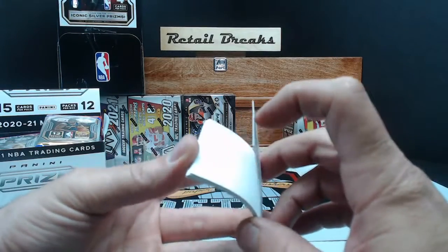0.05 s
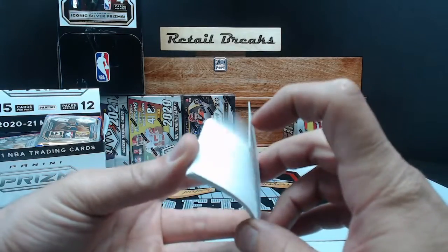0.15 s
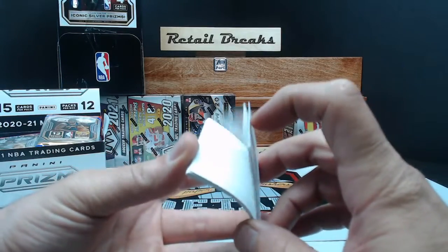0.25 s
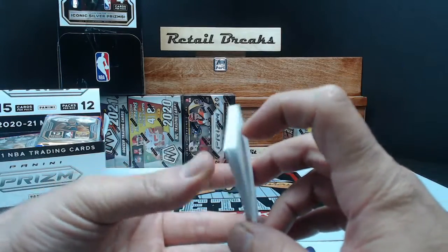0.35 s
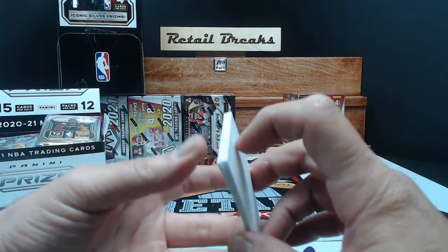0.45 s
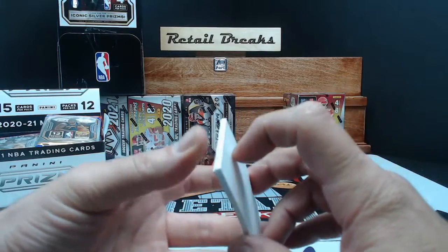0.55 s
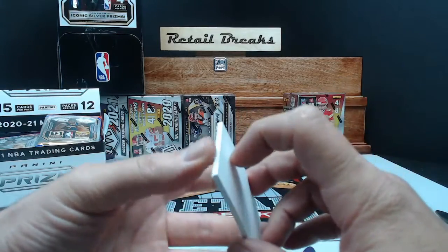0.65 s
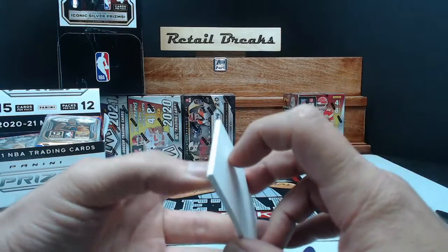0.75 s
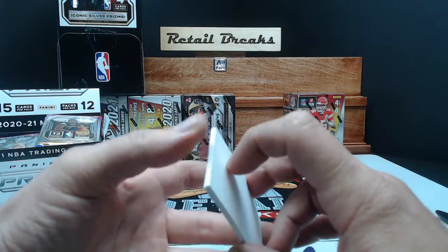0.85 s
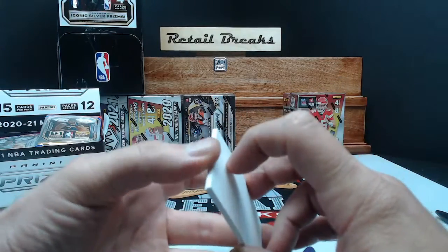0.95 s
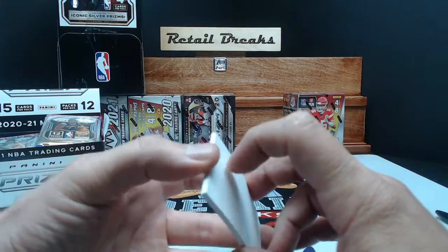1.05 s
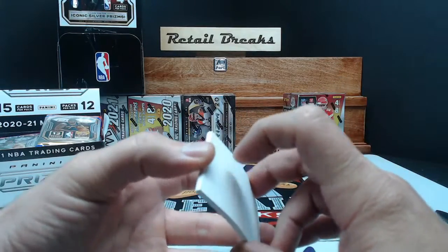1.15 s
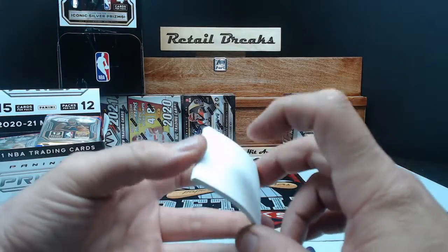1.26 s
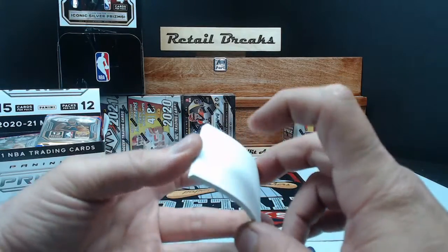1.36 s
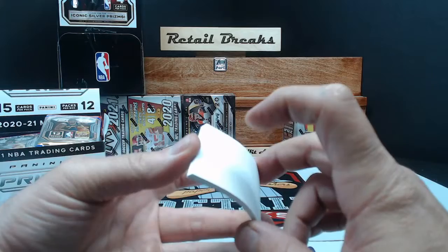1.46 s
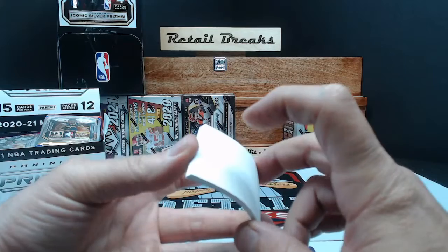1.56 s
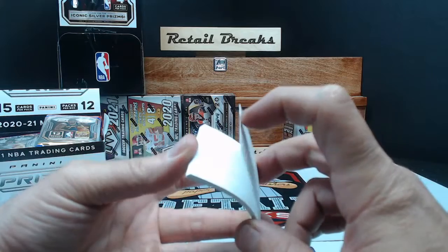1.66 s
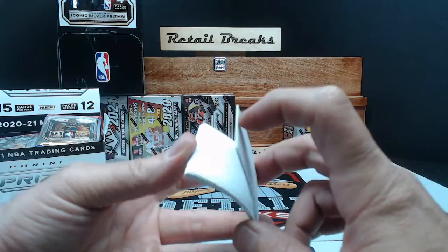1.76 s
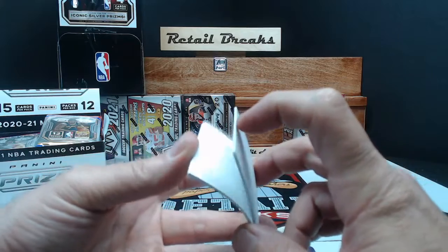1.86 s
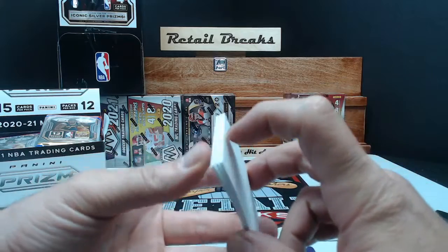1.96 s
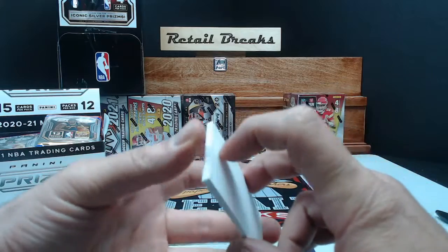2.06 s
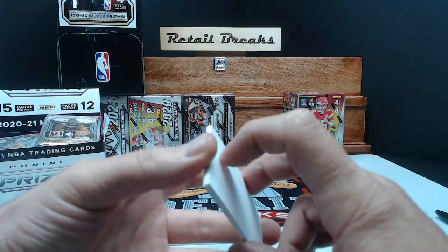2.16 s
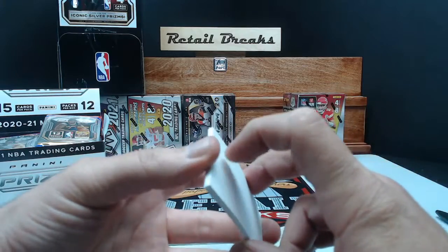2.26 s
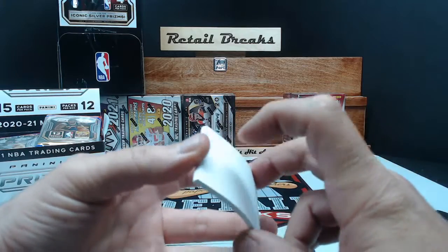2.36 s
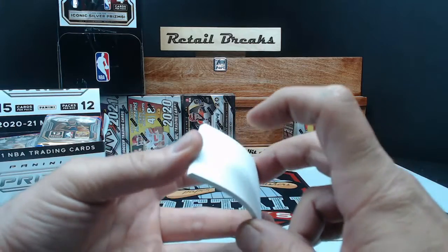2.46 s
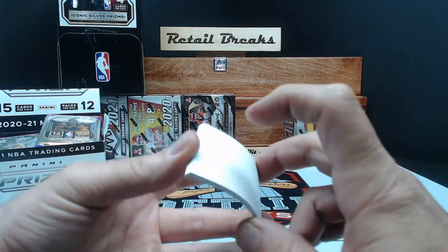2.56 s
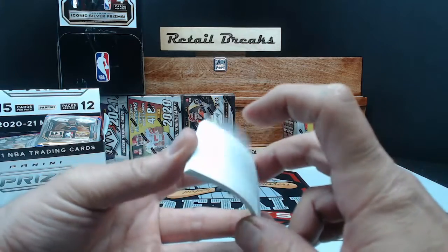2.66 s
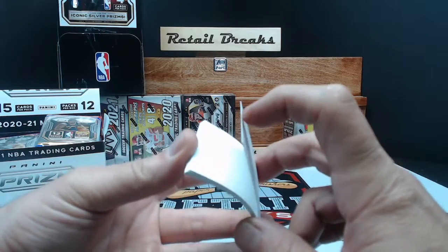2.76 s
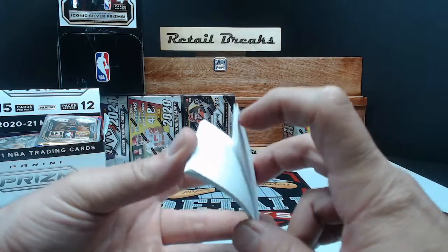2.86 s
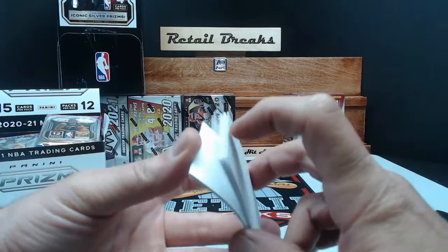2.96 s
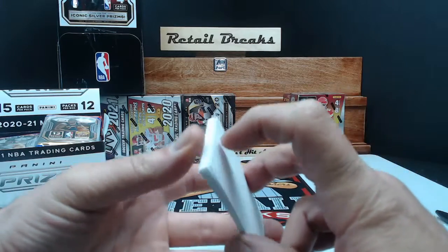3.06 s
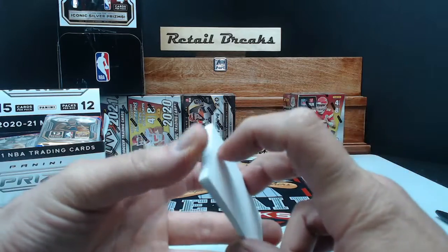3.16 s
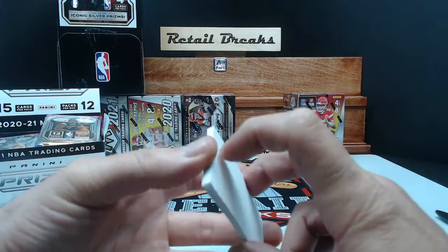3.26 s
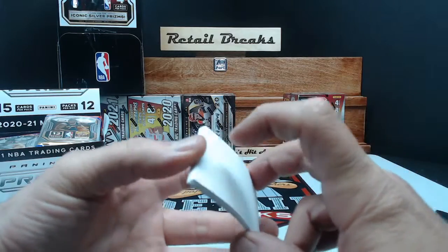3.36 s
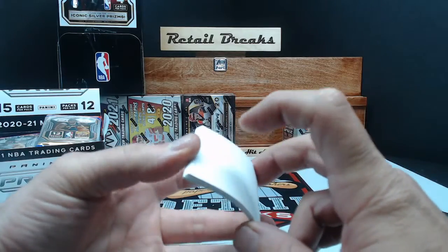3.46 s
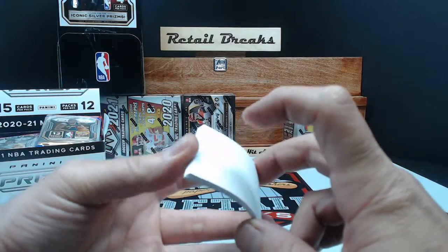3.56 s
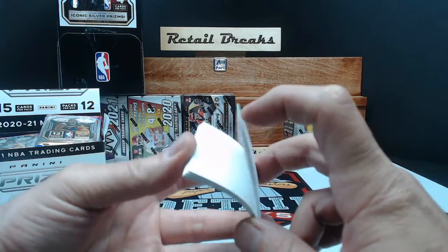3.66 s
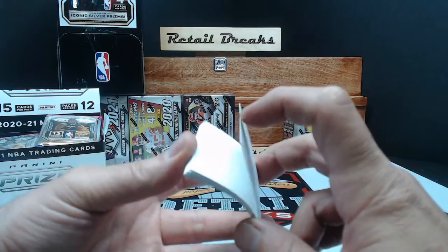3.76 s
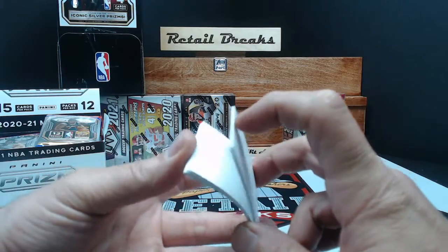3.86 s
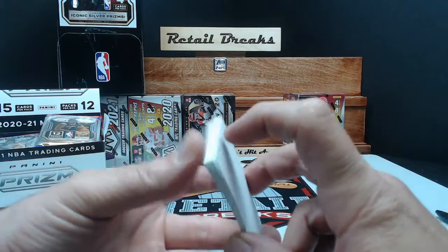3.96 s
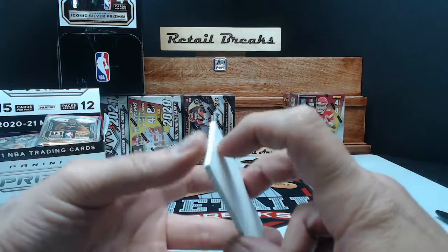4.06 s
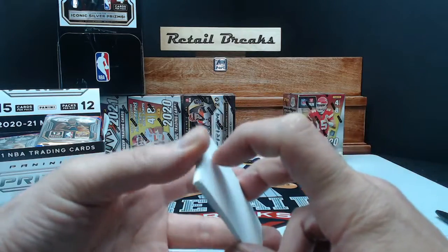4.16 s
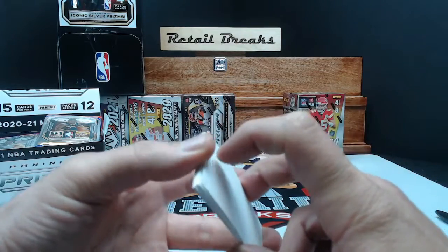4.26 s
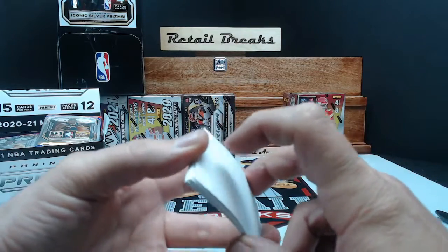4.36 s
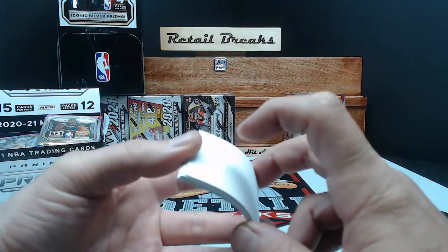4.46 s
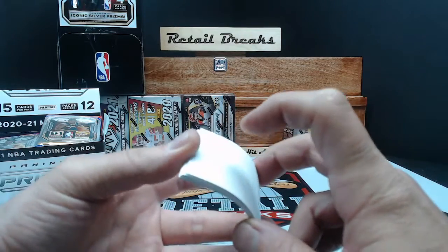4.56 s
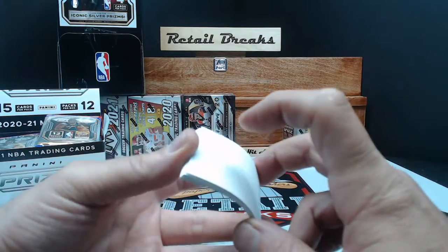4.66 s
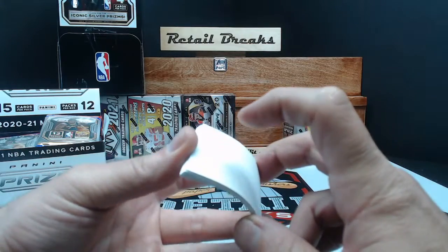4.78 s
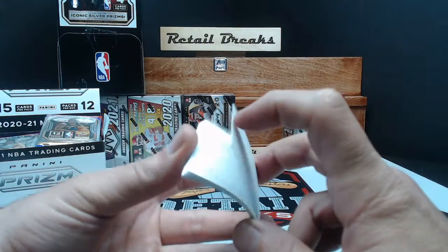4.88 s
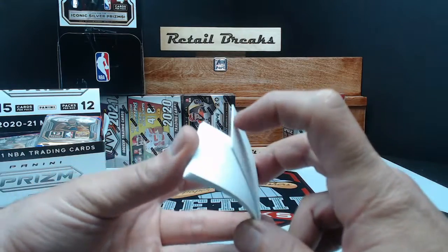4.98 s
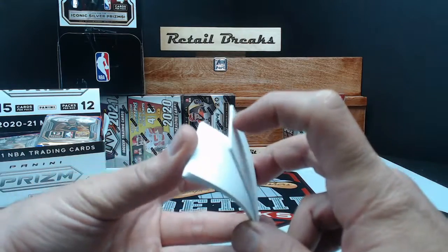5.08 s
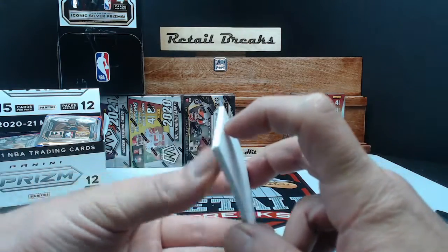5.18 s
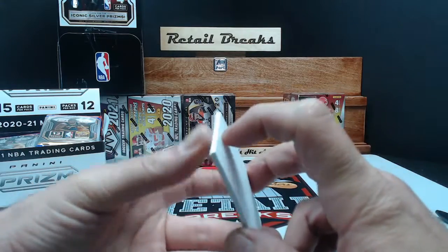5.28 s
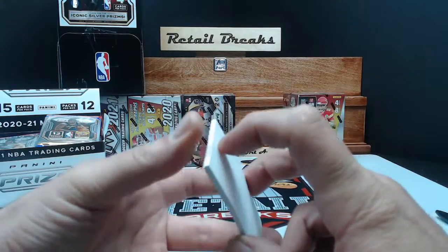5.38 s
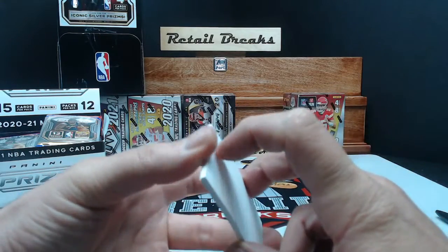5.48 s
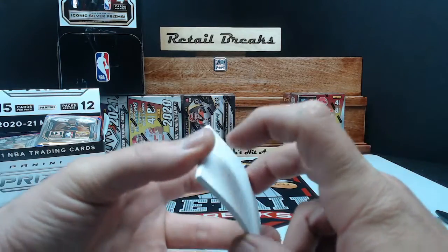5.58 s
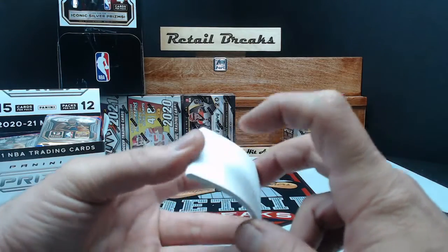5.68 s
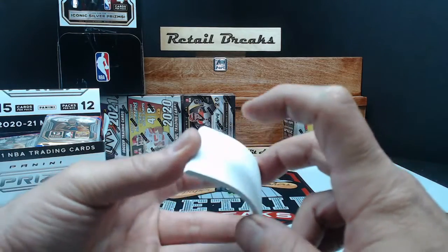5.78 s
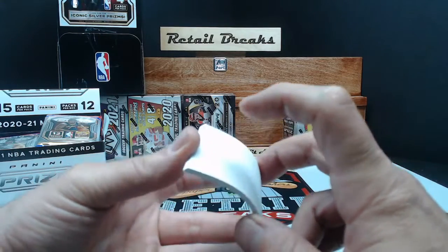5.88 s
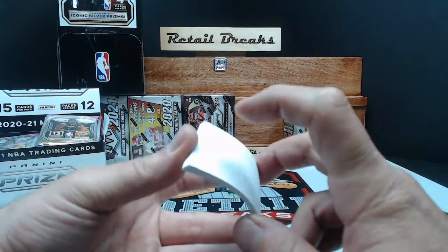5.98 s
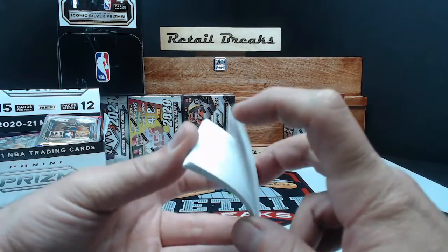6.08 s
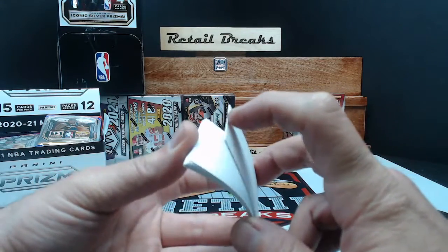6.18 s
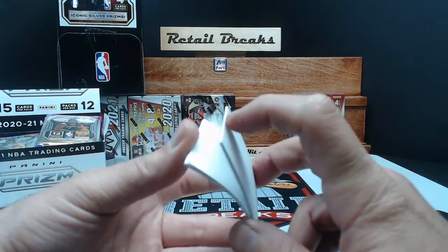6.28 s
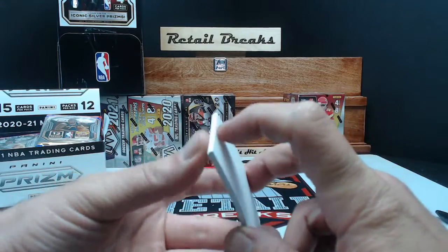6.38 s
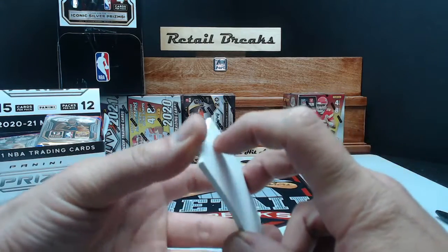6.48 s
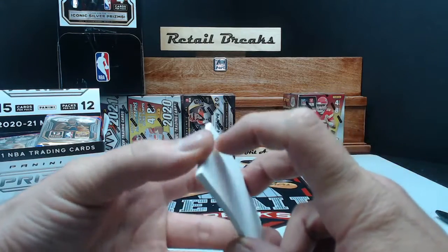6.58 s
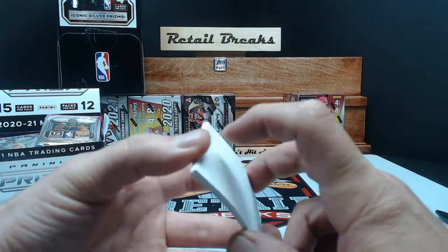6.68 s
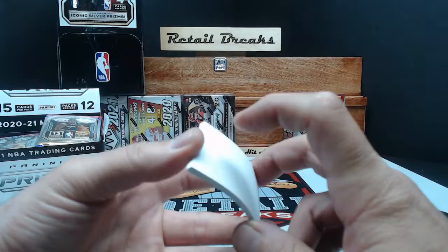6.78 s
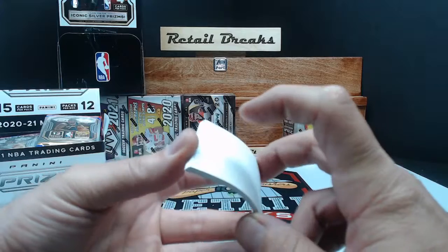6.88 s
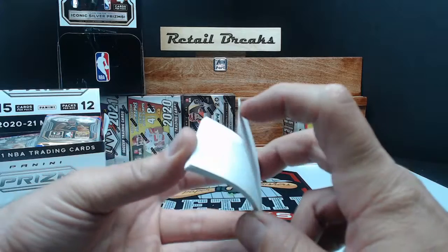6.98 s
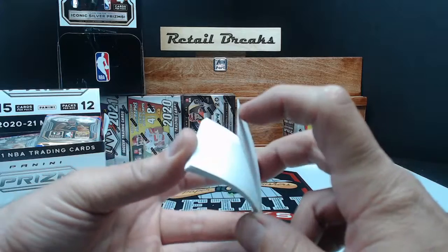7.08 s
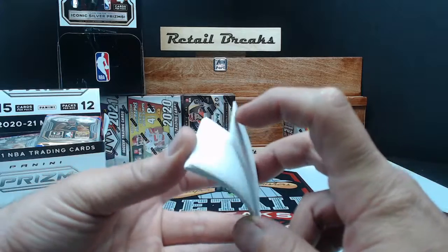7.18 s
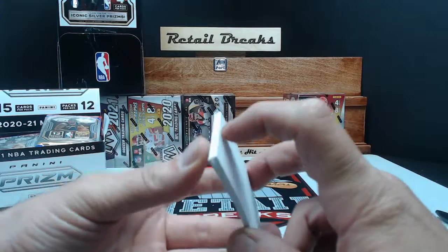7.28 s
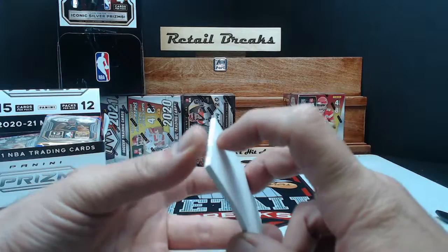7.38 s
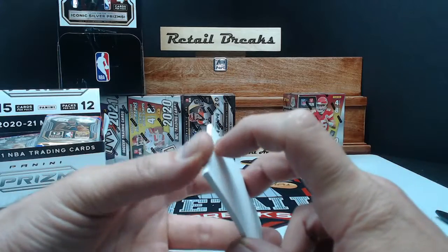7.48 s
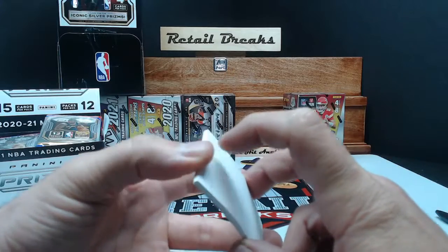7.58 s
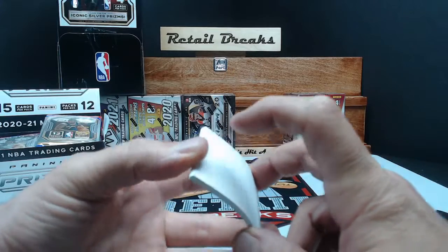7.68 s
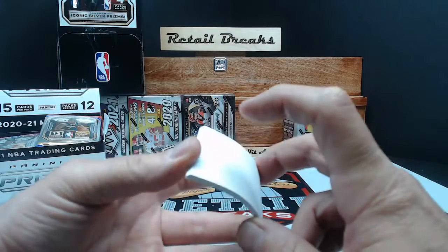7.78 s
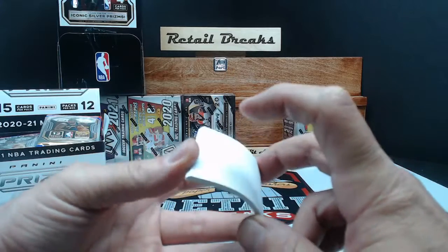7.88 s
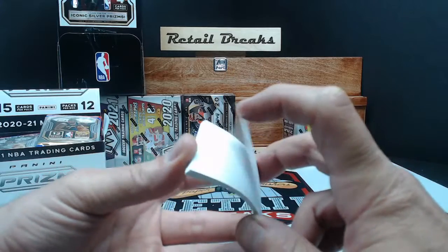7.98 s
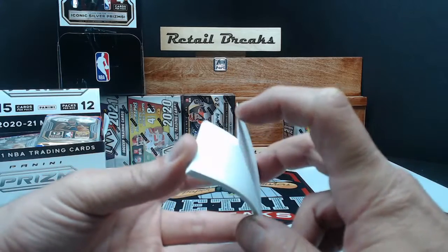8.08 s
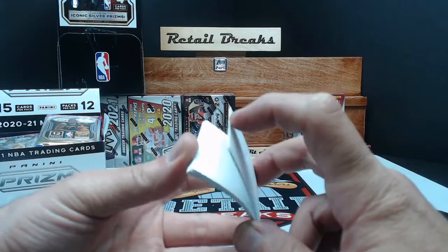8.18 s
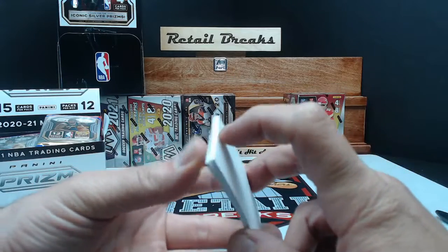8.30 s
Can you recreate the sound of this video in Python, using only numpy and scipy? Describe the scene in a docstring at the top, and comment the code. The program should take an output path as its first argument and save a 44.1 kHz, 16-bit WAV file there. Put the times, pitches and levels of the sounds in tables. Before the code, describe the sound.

A stack of cards is thumbed by hand, each bent card snapping free with a sharp crack, then ticking and scraping back into place over faint hum.

```python
"""Thumbing through trading cards

A stack of trading cards is thumbed through by hand over a desk in a small room.
Each card snaps free as cracking contacts and struck modes, then slaps back against its neighbours.
Its edge ticks over the other edges as bursts of fibre noise set a resonance chirping, until it is tapped home.
Fingers rub and drag as patchy or resonant noise; shifting arms make the desk rumble, over air, hum and whine."""
import sys
import numpy as np
from scipy import signal
from scipy.fft import rfft, irfft, next_fast_len
from scipy.io import wavfile
from scipy.ndimage import uniform_filter1d

SR = 44100
rng = np.random.default_rng(int(sys.argv[2]) if len(sys.argv) > 2 else 0)


def transcribe(signal):
    """Save signal, clipped to [-1, 1], as a 16-bit WAV file at the path in sys.argv[1]."""
    frames = np.atleast_2d(signal).T
    limited = np.clip(frames, -1, 1)
    pcm = np.round(limited * 32767).astype(np.int16)
    wavfile.write(sys.argv[1], SR, pcm)


N = 367794
T = np.arange(N) / SR  # scene time [s]
AGE = T[:4096]  # time since the start of a short sound [s]

# Still air, relative spectrum: (frequency [Hz], level [dB per Hz])
AIR_SPECTRUM = [(20, 4.5), (50, -7.5), (220, -15.5), (420, -14), (520, -28.5), (1350, -21.5), (1900, -24),
                (2800, -39.5), (3200, -46.5), (4050, -36), (4700, -44), (16000, -53)]
AIR_DB = -68.5
# Hum of equipment: (frequency [Hz], resonance width [Hz], level [dB])
HUM_BANDS = [(148, 15, -75), (424.3, 4.9, -79)]
# Thin whine: (time [s], level [dB])
WHINE_LEVEL = [(.8, -80.5), (1.4, -90), (8.3, -89.5)]
WHINE_HZ, WHINE_WIDTH_HZ = 2851, 41

# The arms shift on the desk: (start [s], length [s], level [dB])
ARM_SHIFTS = [(0.063, 0.34, -39), (0.736, 0.07, -41), (0.905, 0.13, -47), (1.271, 0.04, -49),
              (1.643, 0.15, -41.5), (2.01, 0.55, -40.5), (2.652, 0.15, -40.5), (3.084, 0.11, -46.5),
              (3.389, 0.14, -41.5), (3.752, 0.1, -42.5), (4.045, 0.43, -47), (4.937, 0.73, -42),
              (5.152, 0.14, -38), (6, 0.4, -46.5), (6.532, 0.1, -42), (7.037, 0.024, -42.5),
              (7.302, 0.23, -39.5), (7.913, 0.26, -41.5)]
SWAY_RISE_DB_PER_S, SWAY_FADE_DB_PER_S, SWAY_REST_DB = 296.5, 176, -62.5
SWAY_CREST_DB = 1  # a shift is strongest halfway through
# Desk rumble, relative spectrum: (frequency [Hz], level [dB per Hz])
RUMBLE_SPECTRUM = [(15, -13), (26, -2), (33, -19), (43, 4), (54, -15), (72, -14), (105, -25.5), (135, -21),
                   (200, -38), (3000, -120)]
# The heel of a hand thuds on the desk: (time [s], level [dB])
HAND_THUDS = [(1.009, -44.5), (2.079, -42), (5.16, -44), (5.436, -48.5), (6.346, -35.5), (6.6, -48)]
THUD_HZ, THUD_WIDTH_HZ = 119, 51

# A fingertip drags to its new hold: (mid-time [s], level [dB], pitch of the rub [Hz])
FINGER_DRAGS = [(.53, -64.5, 726), (.76, -64.5, 1260), (1.511, -66, 430), (2.199, -63.5, 414),
                (2.461, -59.5, 415), (2.552, -83, 4800), (2.561, -62, 422), (3.31, -58, 443),
                (3.346, -70.5, 1510), (4.126, -64, 511.5), (4.4, -57.5, 410), (4.621, -60.5, 390),
                (5.567, -67, 1175), (5.96, -56.5, 384), (6.473, -62.5, 680), (6.74, -59, 423),
                (7.171, -54.5, 410), (7.769, -57.5, 400)]
DRAG_S, DRAG_SINKS_OCT_PER_S = 0.11, 1.6
DRAG_WIDTH = 0.18  # resonance width as a share of the pitch
# Skin on card, relative spectrum: (frequency [Hz], level [dB per Hz])
SKIN_SPECTRUM = [(90, -4.5), (200, 12.5), (310, -5.5), (420, 5), (560, -9.5), (1050, -10), (1350, -13),
                 (1900, -24), (2800, -29), (4000, -54.5)]
# The grip rubs along with every shift, GRIP_DB relative to it, and tightens just before each snap
GRIP_DB, GRIP_RISE_DB_PER_S, GRIP_FADE_DB_PER_S = -21.5, 122.5, 42
BEND_S, BEND_DB = 0.11, -65
# Card sliding on card, relative spectrum: (frequency [Hz], level [dB per Hz])
FACE_SPECTRUM = [(100, -3), (220, 6), (420, -1.5), (1000, -8), (1300, -5), (1900, -16), (2700, -19),
                 (3300, -48)]
# Soft mid-range noise swells during each slide and fades slowly after the tap
FACE_DB, FACE_RISE_DB_PER_S, FACE_FADE_DB_PER_S = -57.5, 147, 18

# The fingers take a new hold: (time [s], rub level [dB], hollow knock of the stack [dB])
FINGER_BUMPS = [(1.998, -51, -53.5), (3.271, -49.5, -52.5), (4.211, -46, -52.5)]
KNOCK_HZ, KNOCK_WIDTH_HZ = 942, 180
# The card is pushed home: (time [s], level [dB])
HOME_TAPS = [(0.316, -30.5), (1.928, -40), (2.988, -47), (3.949, -43.5), (5.145, -36), (6.317, -41.5),
             (7.257, -41), (8.274, -44.5)]
# Tap, relative spectrum: (frequency [Hz], level [dB per Hz])
TAP_SPECTRUM = [(200, -31), (1700, -2.5), (2300, 5.5), (4000, 2), (5000, 2), (6300, 3), (7200, -1),
                (9500, -4.5), (12000, -21)]

# Each card slides along the stack until its tap: start [s]
SLIDE_STARTS = [0.151, 1.701, 2.794, 3.764, 5.033, 6.209, 7.137, 8.15]
# The edge catches hard during a slide: (time [s], edge chirp [dB], fibre rasp [dB])
EDGE_CATCHES = [(0.151, -47.5, -46), (0.1636, -52, -48), (0.1904, -63, -52), (0.2159, -45.5, -42.5),
                (0.253, -65, -58), (0.2741, -45.5, -48.0), (0.3019, -42.5, -45), (1.7043, -48.5, -48),
                (1.7631, -49.5, -47.5), (1.857, -63, -48.5), (1.8907, -52.5, -49), (2.803, -50.5, -52),
                (2.8354, -65, -62), (2.8797, -53, -50.5), (2.9158, -53.5, -64), (2.9483, -48.5, -54),
                (3.768, -69.5, -41), (3.8255, -74, -45.5), (3.87, -44.5, -48.5), (3.8881, -51, -47),
                (5.036, -58, -44), (5.071, -49, -43.5), (5.102, -48, -41), (6.2102, -51, -46.5),
                (6.2505, -44.5, -49), (6.278, -45.5, -48.5), (7.136, -48.5, -48.5), (7.161, -51.5, -46.5),
                (7.191, -57, -47.5), (7.2139, -48.5, -44), (8.1508, -44.5, -56), (8.203, -46.5, -67),
                (8.2349, -48.5, -69), (8.252, -45, -58)]
# Between the hard catches it flutters lightly
FLUTTER_GAP_S, FLUTTER_DB, FLUTTER_SPREAD_DB = .011, -67, 2
# The edge's note sinks as more of it comes free
EDGE_HZ, EDGE_WIDTH_HZ, EDGE_SINKS_OCT_PER_S = 3980, 530, 0.7
# Rasp of the fibres, relative spectrum: (frequency [Hz], level [dB per Hz])
RASP_SPECTRUM = [(1600, -9.5), (4200, -1.5), (4900, -6), (5500, 5.5), (6400, 1), (7300, -4), (9300, 1.5),
                 (11500, -22), (15000, -19)]

# The loose card rebounds against its neighbours, and the row at 5.153 s is the card ringing as it is tapped
# home: (time [s], crack [dB], card ring [dB])
CARD_SLAPS = [(0.024, -39.5, -35.5), (1.605, -56, -43), (1.62, -52, -37), (1.7128, -45.5, -37),
              (1.728, -50, -50.5), (1.772, -51, -41.5), (2.686, -48, -37), (2.706, -56, -45),
              (2.814, -54.5, -50.5), (3.637, -46, -41), (3.7782, -53, -42.5), (3.834, -57, -47),
              (4.875, -47, -48), (4.899, -46, -39), (5.0443, -45.5, -43.5), (5.153, -40, -37),
              (6.090, -54, -37), (6.130, -43, -40.5), (6.218, -49.5, -44.5), (6.967, -44, -46),
              (7.146, -50, -40.5), (7.971, -55.5, -42), (7.988, -61, -39), (8.1599, -54, -41.5)]
# A bent card springs free: (time [s], crack [dB], crack tilt towards the treble [dB],
# card ring [dB], main card pitch [Hz], stack thump [dB], settling rustle [dB])
CARD_SNAPS = [(0.0, -29, -2, -24.5, 1235, -44.5, -46), (1.584, -30.5, -12, -26, 1202, -39.5, -43),
              (2.662, -30.5, -7, -28, 1127, -39, -54), (3.6129, -32, -6, -28.5, 1162, -38, -50),
              (4.859, -27, -4, -25.5, 1182, -40, -39), (6.0714, -31.5, -7, -29, 1150, -39, -49.5),
              (6.95, -29.5, -2, -24, 1202, -41.5, -45), (7.9508, -32, -1, -27.5, 1182, -38, -50)]
# Modes of a card held in the fingers: (frequency [Hz], relative level [dB], t60 before damping [s])
CARD_MODES = [(442, -18, 0.03), (590, -14.5, 0.03), (895, -9, 0.043), (1048, -4.5, 0.04),
              (1169, -3.5, 0.04), (2309, -16, 0.018)]
# Modes of the stack and hand: (frequency [Hz], relative level [dB], t60 before damping [s])
STACK_MODES = [(146, 1, 0.085), (202.6, 4, 0.083)]
# Crack of a hard contact, relative spectrum: (frequency [Hz], level [dB per Hz])
CRACK_SPECTRUM = [(300, -9.5), (700, -7), (1700, -5), (2350, 2), (2900, -2), (4200, 3.5), (5100, -7.5),
                  (6200, 0), (7100, -6.5), (8700, 2.5), (12200, -14.5), (15500, -13.5)]
# A faint rasp swells before every snap but the first
LEAD_IN_S, LEAD_IN_DB = .011, -52
SETTLE_PER_S, SETTLE_S = 700, 0.0056  # tiny contacts per second, decay time as cards settle

# A box on the desk rings along with the cards, at a level relative to them
BOX_HZ, BOX_WIDTH_HZ, BOX_DB = 1223, 25, -1
# Nearby surfaces: (delay [ms], level [dB])
SURFACE_ECHOES = [(.85, -26.5), (1.7, -25), (4.2, -16)]
# Decay of the room: (frequency [Hz], t60 [s])
ROOM_DECAY = [(150, .28), (1000, .225), (3000, .225), (7000, .25), (15000, .2)]
# Tail of the room: (frequency [Hz], level [dB])
ROOM_LEVEL = [(150, 6.5), (800, -4.5), (1200, -5.5), (2400, -6), (6000, -13.5), (15000, -9.5)]
# The microphone's response has a narrow dip, and the top is cut
DIP_HZ, DIP_WIDTH_HZ, CUTOFF_HZ = 1943, 55, 16000


def from_db(db):
    """Decibels to gain."""
    return 10 ** (np.asarray(db) / 20)


def rms_one(x):
    """Scale to rms 1."""
    return x / np.sqrt(np.mean(x ** 2) + 1e-20)


def hit_one(x):
    """Scale a short sound to the energy of 4 ms at rms 1."""
    return x / np.sqrt(np.sum(x ** 2) / (.004 * SR) + 1e-20)


def at_hz(points, hz):
    """Read a table on a log-frequency axis."""
    f, value = np.transpose(points)
    return np.interp(np.log(np.maximum(hz, 1)), np.log(f), value)


def add(track, s, sound):
    """Mix a sound in at a time in seconds."""
    start = max(0, round(s * SR))
    track[start:start + len(sound)] += sound[:N - start]


def colour(x, spectrum):
    """Causal (minimum-phase) filter with the given spectrum, built by folding its cepstrum."""
    size = 2 * next_fast_len(len(x))
    gain = from_db(at_hz(spectrum, np.fft.rfftfreq(size, 1 / SR)))
    cepstrum = irfft(np.log(gain))
    cepstrum[1:size // 2] *= 2
    cepstrum[size // 2 + 1:] = 0
    return irfft(rfft(x, size) * np.exp(rfft(cepstrum)))[:len(x)]


def resonate(x, hz, width_hz):
    """One two-pole resonance with gain 1 on top."""
    r = np.exp(-np.pi * width_hz / SR)
    zeros = np.array([1, 0, -1]) * (1 - r * r) / 2
    poles = [1, -2 * r * np.cos(2 * np.pi * hz / SR), r * r]
    return signal.lfilter(zeros, poles, x + 1e-18)


def bandpass(x, edges_hz):
    """Keep one band of a sound."""
    return signal.sosfilt(signal.butter(2, edges_hz, "band", fs=SR, output="sos"), x)


def swells(spans, rise_db_per_s, fade_db_per_s, crest_db):
    """Gain that rises to each (start, end, dB), arches about that level, and fades; the strongest leads."""
    t = T[::64]
    levels = []
    for start, end, db in spans:
        rise = rise_db_per_s * np.maximum(start - t, 0)
        fade = fade_db_per_s * np.maximum(t - end, 0)
        arch = np.sin(np.pi * np.clip((t - start) / (end - start), 0, 1)) - .5
        levels.append(db - rise - fade + crest_db * arch)
    return np.interp(T, t, from_db(np.max(levels, axis=0)))


def rustle(patchy_db):
    """Noise whose narrow bands swell and fade each on its own."""
    edges = np.geomspace(100, 3000, num=29)
    knots = np.linspace(0, T[-1], num=190)
    white, out = rng.standard_normal((2, N)), 0
    for k, band_hz in enumerate(zip(edges, edges[1:])):
        knot_db = patchy_db * np.clip(rng.standard_normal(len(knots)), -2, 2)
        gain = np.interp(T, knots, from_db(knot_db))
        out = out + gain * bandpass(white[k % 2], band_hz)
    return out


def friction(envelope, grain_db):
    """Tiny catches of paper fibre, uneven in size, under an envelope."""
    grain_gain = from_db(grain_db * rng.standard_normal(len(AGE)))
    return hit_one(rng.standard_normal(len(AGE)) * grain_gain * envelope)


def ring(modes, detune, vary_db, free_s, damp_db):
    """Struck modes ring freely until the card settles and is damped; the grip varies from blow to blow."""
    out = 0
    for k, (hz, db, t60) in enumerate(modes):
        pitch = hz * (1 + detune * rng.standard_normal())
        decay = from_db(db + vary_db * rng.standard_normal() - 60 * AGE / t60)
        out = out + (-1) ** k * decay * np.sin(2 * np.pi * pitch * AGE)
    damping = from_db(damp_db * np.clip(2 * (AGE / free_s - 1), 0, 1))
    return hit_one(out * damping)


def background():
    """Still air is coloured noise; the faint, wavering hum and thin whine are noise in narrow resonances."""
    def band(hz, width):
        """Noise through the same resonance twice."""
        return rms_one(resonate(resonate(rng.standard_normal(N), hz, width), hz, width))
    hum = sum(from_db(db) * band(hz, width) for hz, width, db in HUM_BANDS)
    whine = from_db(np.interp(T, *np.transpose(WHINE_LEVEL))) * band(WHINE_HZ, WHINE_WIDTH_HZ)
    air = from_db(AIR_DB) * rms_one(colour(rng.standard_normal(N), AIR_SPECTRUM))
    return air + hum + whine


def desk():
    """Each shift of the arms is a run of small uneven nudges that set the desk swaying at low resonances."""
    nudges = (rng.random(N) < 30 / SR) * rng.standard_normal(N)
    force = rms_one(nudges) + from_db(-6.5) * rng.standard_normal(N)
    rumble = rms_one(colour(force, RUMBLE_SPECTRUM))
    # even out the level over 150 ms, so that the shifts set it
    rumble /= np.sqrt(uniform_filter1d(rumble ** 2, size=6600) + .02)
    moves = [(s, s + length, db) for s, length, db in ARM_SHIFTS]
    sway = swells(moves, SWAY_RISE_DB_PER_S, SWAY_FADE_DB_PER_S, SWAY_CREST_DB)
    return (from_db(SWAY_REST_DB) + sway) * rumble


def thuds():
    """A soft push of the hand makes the desk top boom briefly."""
    out = np.zeros(N)
    for s, db in HAND_THUDS:
        push = rng.standard_normal(len(AGE)) * AGE * np.exp(-AGE / 0.0088)
        boom = resonate(resonate(push, THUD_HZ, THUD_WIDTH_HZ), THUD_HZ, 2 * THUD_WIDTH_HZ)
        add(out, s, from_db(db) * hit_one(boom))
    return out


def drags():
    """Skin sticks and slips on a card for a moment, with a hollow note that sinks as the finger slows."""
    out, t = np.zeros(N), T[:SR // 2]
    for s, db, hz in FINGER_DRAGS:
        width = DRAG_WIDTH * hz
        note = resonate(resonate(rng.standard_normal(SR), hz, width), hz, width)
        # reading the note ever more slowly lowers its pitch
        speed = 2 ** (-DRAG_SINKS_OCT_PER_S * (t - DRAG_S / 2))
        note = np.interp(np.cumsum(speed), np.arange(SR), note)
        note = note * np.sin(np.pi * np.minimum(t / DRAG_S, 1))
        level = np.sqrt(np.sum(note ** 2) / (DRAG_S * SR / 2))
        add(out, s - DRAG_S / 2, from_db(db) * note / level)
    return out


def rubbing():
    """Skin drags dully as the arms shift and a card is bent; a soft mid-range noise swells with each slide."""
    grips = [(s, s + length, db + GRIP_DB) for s, length, db in ARM_SHIFTS]
    grips += [(s - BEND_S, s, BEND_DB) for s, *_ in CARD_SNAPS]
    strokes = [(start, home, FACE_DB) for start, (home, _) in zip(SLIDE_STARTS, HOME_TAPS)]
    drag = rustle(patchy_db=11.0)
    grip_gain = swells(grips, GRIP_RISE_DB_PER_S, GRIP_FADE_DB_PER_S, crest_db=-2.0)
    skin = grip_gain * rms_one(colour(drag, SKIN_SPECTRUM))
    # the same rustle backwards gives the face its own texture
    face = rms_one(colour(drag[::-1], FACE_SPECTRUM))
    return skin + swells(strokes, FACE_RISE_DB_PER_S, FACE_FADE_DB_PER_S, crest_db=3.0) * face


def bumps():
    """Fingertips land on the stack, dull and soft, as friction noise and a hollow resonance."""
    out = np.zeros(N)
    for s, db, knock_db in FINGER_BUMPS:
        force = friction((1 - np.exp(-AGE / 0.007)) * np.exp(-AGE / 0.047), grain_db=-2.5)
        add(out, s, from_db(db) * hit_one(colour(force, SKIN_SPECTRUM)))
        landing = force * np.exp(-AGE / 0.0097)
        knock = resonate(resonate(landing, KNOCK_HZ, KNOCK_WIDTH_HZ), KNOCK_HZ, KNOCK_WIDTH_HZ)
        add(out, s, from_db(knock_db) * hit_one(knock))
    return out


def taps():
    """The card skids home with a soft chuck, coloured by where it meets the stack."""
    out = np.zeros(N)
    for s, db in HOME_TAPS:
        force = friction((1 - np.exp(-AGE / 0.0015)) * np.exp(-AGE / 0.0072), grain_db=6.0)
        tone = [(hz, level + 2.5 * rng.standard_normal()) for hz, level in TAP_SPECTRUM]
        add(out, s, from_db(db) * hit_one(colour(force, tone)))
    return out


def slip(edge_hz, chirp_db, rasp_db):
    """A catching edge lets go: a dry rasp of fibres swells, sets it chirping and faintly knocks the card."""
    phase = AGE / .0014
    force = friction(phase ** 3 * np.exp(-phase), grain_db=6)
    hz = edge_hz * (1 + 0.036 * rng.standard_normal())
    chirp = hit_one(resonate(resonate(force, hz, EDGE_WIDTH_HZ), hz, 2 * EDGE_WIDTH_HZ))
    knock = ring(CARD_MODES, detune=.08, vary_db=3, free_s=.004, damp_db=-13)
    rasp = hit_one(colour(force, RASP_SPECTRUM))
    return from_db(chirp_db) * chirp + from_db(rasp_db) * (rasp + from_db(-8.0) * knock)


def slides():
    """The edge ticks over the others, hard catches among light ones, its note ever lower on its way home."""
    out = np.zeros(N)
    for start, (home, _) in zip(SLIDE_STARTS, HOME_TAPS):
        hard = [row for row in EDGE_CATCHES if start - FLUTTER_GAP_S < row[0] < home]
        light = []
        for s in np.arange(start, home - FLUTTER_GAP_S, FLUTTER_GAP_S):
            tick_s = s + FLUTTER_GAP_S * rng.random()
            levels_db = FLUTTER_DB + FLUTTER_SPREAD_DB * rng.standard_normal(2)
            light.append((tick_s, *levels_db))
        for s, chirp_db, rasp_db in hard + light:
            edge_hz = EDGE_HZ * 2 ** (-EDGE_SINKS_OCT_PER_S * (s - start))
            # start early: the friction swells for about 4 ms
            add(out, s - .004, slip(edge_hz, chirp_db, rasp_db))
    return out


def crack(chatter_s, chatter_db):
    """One hard contact, then a brief chatter of card on card."""
    click = hit_one(1. * (AGE == 0))
    chatter = friction(np.exp(-AGE / chatter_s), grain_db=-5.5)
    return hit_one(colour(click + from_db(chatter_db) * chatter, CRACK_SPECTRUM))


def slaps():
    """The loose card slaps its neighbours, and once rings as it is tapped home: a crack with slightly lifted
    treble and a ring that is soon choked."""
    out = np.zeros(N)
    for s, crack_db, ring_db in CARD_SLAPS:
        body = ring(CARD_MODES, detune=.08, vary_db=3, free_s=.003, damp_db=-12)
        contact = crack(chatter_s=0.0024, chatter_db=6.0)
        contact = hit_one(colour(contact, [(4000, -5.5), (12000, -2.5)]))
        add(out, s, from_db(crack_db) * contact + from_db(ring_db) * body)
    return out


def snaps():
    """The released card cracks against the stack, rings, thumps the hand and rustles to rest."""
    out = np.zeros(N)
    main_hz = max(CARD_MODES, key=lambda mode: mode[1])[0]  # the loudest mode
    for s, crack_db, tilt_db, ring_db, pitch_hz, thump_db, settle_db in CARD_SNAPS:
        contact = crack(chatter_s=.0028, chatter_db=5)
        tilted = hit_one(colour(contact, [(2500, 0.012), (9000, tilt_db)]))
        add(out, s, from_db(crack_db) * tilted)

        grains = (rng.random(len(AGE)) < SETTLE_PER_S / SR) * rng.standard_normal(len(AGE))
        settling = grains * AGE ** 2 * np.exp(-AGE / SETTLE_S)
        add(out, s, from_db(settle_db) * hit_one(colour(settling, CRACK_SPECTRUM)))

        bent = [(hz * pitch_hz / main_hz, db, t60) for hz, db, t60 in CARD_MODES]
        body = ring(bent, detune=.02, vary_db=2, free_s=.008, damp_db=-9)
        add(out, s, from_db(ring_db) * body)
        thump = ring(STACK_MODES, detune=0.027, vary_db=-1.5, free_s=0.011, damp_db=-1.0)
        add(out, s, from_db(thump_db) * thump)

        if s > LEAD_IN_S:  # a faint rasp swells for 11 ms before every snap but the first
            noise = friction(np.sin(np.pi * np.minimum(AGE / LEAD_IN_S, 1)), grain_db=7)
            lead_in = hit_one(colour(noise, RASP_SPECTRUM)) + hit_one(resonate(noise, main_hz, 770))
            add(out, s - LEAD_IN_S, from_db(LEAD_IN_DB) * lead_in)
    return out


def room(x):
    """Echoes off nearby surfaces and a diffuse tail of noise bands, each with its own decay."""
    t = T[:SR // 2]
    response = 1. * (t == 0)  # direct sound
    edges = np.geomspace(80, 18000, num=10)
    for low, high in zip(edges, edges[1:]):
        hz = np.sqrt(low * high)
        band = bandpass(rng.standard_normal(len(t)), [low, high])
        tail = band * from_db(-60 * t / at_hz(ROOM_DECAY, hz)) * (1 - np.exp(-t / .004))
        share = np.sqrt(2 * (high - low) / SR / len(t))  # wider bands carry more energy
        response += from_db(at_hz(ROOM_LEVEL, hz)) * rms_one(tail) * share
    for ms, db in SURFACE_ECHOES:
        response[max(1, round(ms * SR / 1000))] += from_db(db)
    return signal.fftconvolve(x, response)[:N]


def scene():
    """Cards beside a box in the room, over the hands, the desk and the hum."""
    cards = snaps() + slaps() + slides() + taps() + bumps()
    box = from_db(BOX_DB) * resonate(cards, BOX_HZ, BOX_WIDTH_HZ)
    hands = rubbing() + drags() + thuds()
    return (room(cards) + box + hands + desk() + background())[None]


def record(dry):
    """The microphone has a narrow dip; the top is cut steeply."""
    dipped = dry - resonate(dry, DIP_HZ, DIP_WIDTH_HZ)
    return signal.sosfilt(signal.ellip(10, .2, 80, CUTOFF_HZ, fs=SR, output="sos"), dipped)


dry = scene()
out = record(dry)
transcribe(out)
```